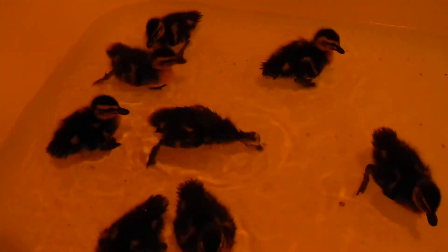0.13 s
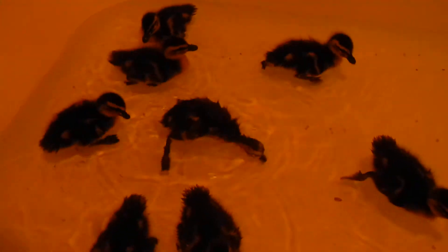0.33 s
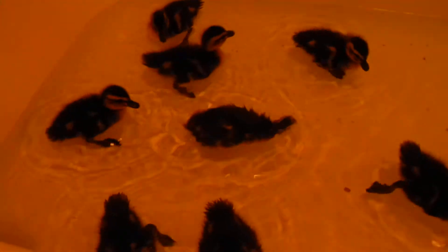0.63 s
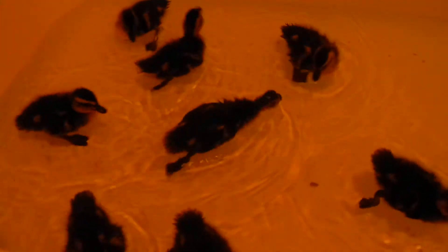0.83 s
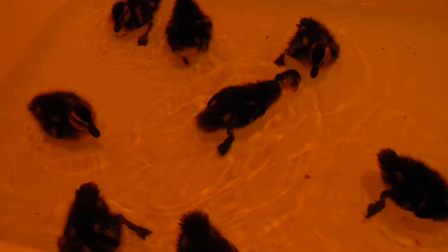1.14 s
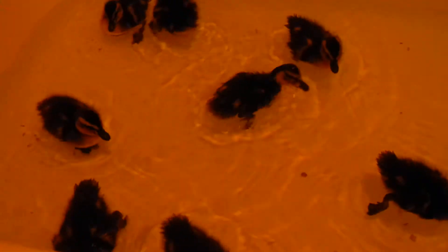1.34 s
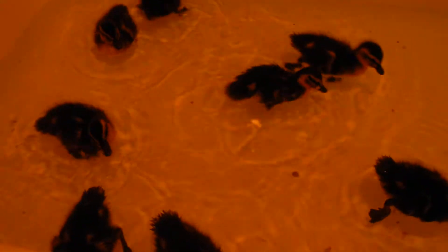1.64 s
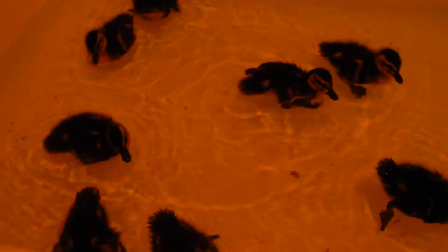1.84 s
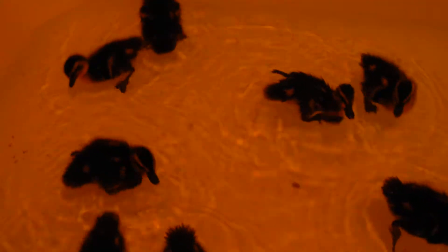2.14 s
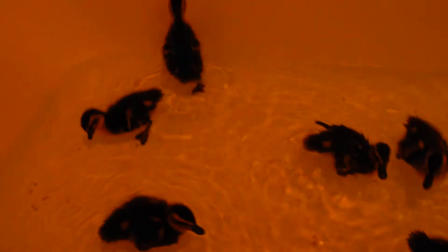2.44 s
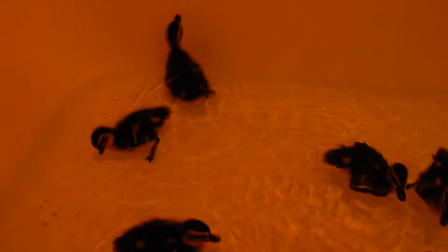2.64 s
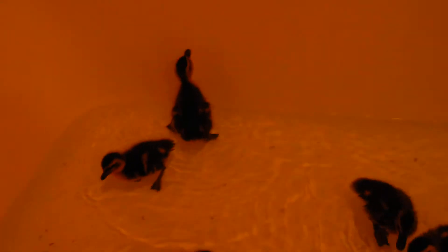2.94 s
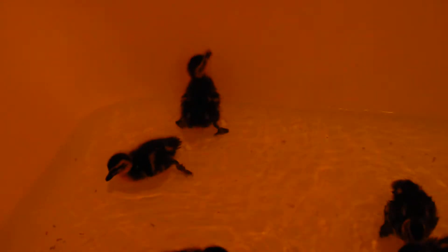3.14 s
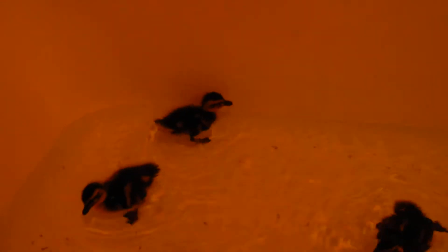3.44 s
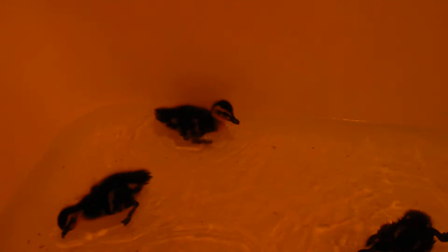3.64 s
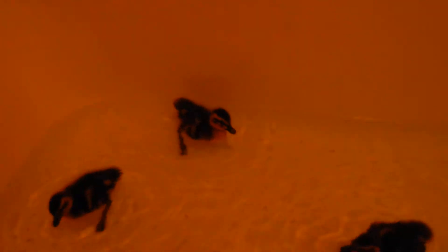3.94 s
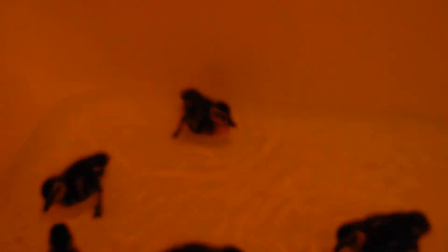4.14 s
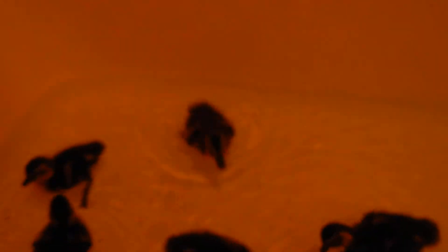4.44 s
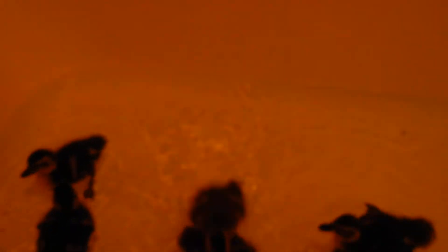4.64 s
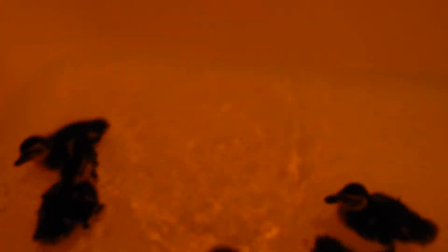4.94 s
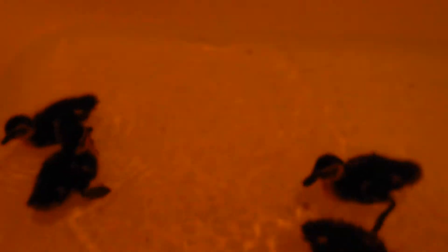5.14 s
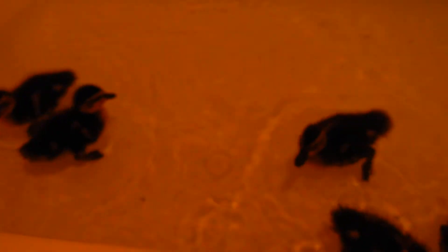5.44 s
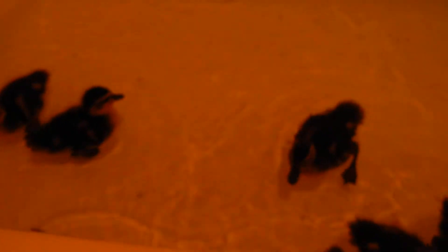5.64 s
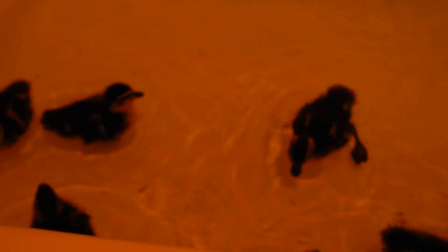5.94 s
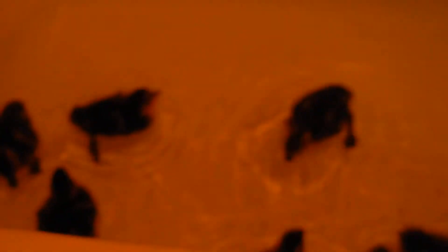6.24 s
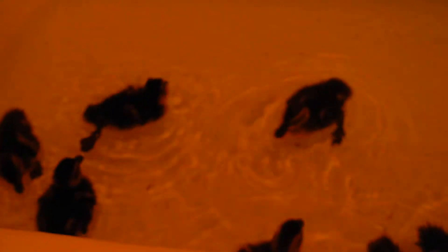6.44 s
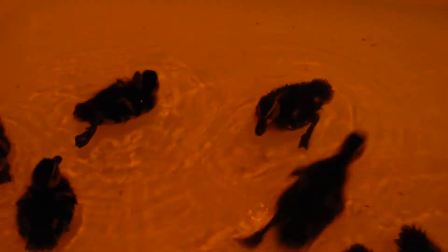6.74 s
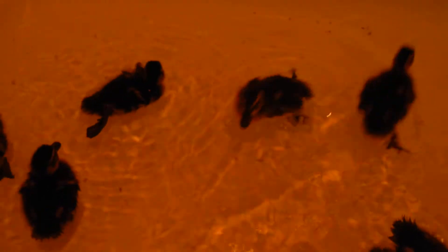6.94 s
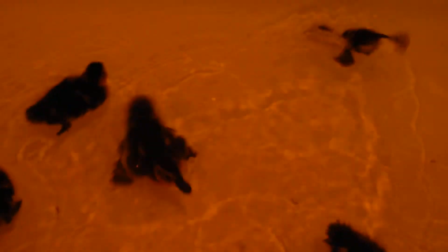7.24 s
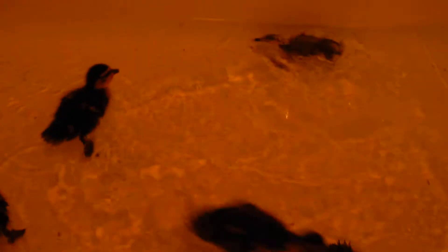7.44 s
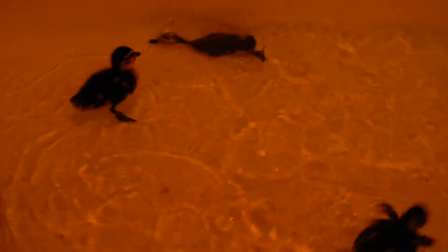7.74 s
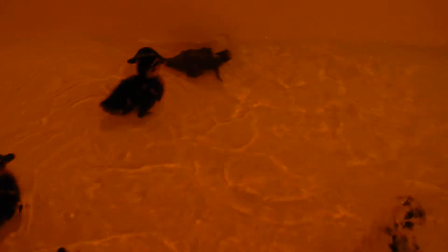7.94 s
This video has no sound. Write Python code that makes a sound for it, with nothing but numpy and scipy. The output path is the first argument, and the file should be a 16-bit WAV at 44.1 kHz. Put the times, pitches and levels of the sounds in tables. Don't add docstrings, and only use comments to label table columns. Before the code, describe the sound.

A close, slightly hissy camera microphone in a small tiled bathroom hears a low ceiling fan hum and gentle lapping. Little feet and bills make scattered plips, crackling sprays and dull tub thumps, with two tiny peeps early and three midway. The lens motor whirrs briefly. After a calm stretch the splashing thickens, ending in two bursts of frantic, foamy paddling full of bright bubble plinks.

```python
import sys
import numpy as np
from scipy import signal
from scipy.fft import rfft, irfft, next_fast_len
from scipy.io import wavfile
from scipy.ndimage import uniform_filter1d, map_coordinates

SR = 44100
rng = np.random.default_rng(int(sys.argv[2]) if len(sys.argv) > 2 else 0)


def transcribe(u):
    v = np.clip(np.atleast_2d(u).T, -1, 1)
    q = np.round(v * 32767).astype(np.int16)
    wavfile.write(sys.argv[1], SR, q)


def how_loud(loudness_db):
    steps = np.asarray(loudness_db, float) / 20
    return 10 ** steps


N = 357210

# (time [s], level [dB])
CAMERA_GAIN = [(0.0, -54), (1.46, -54), (1.96, -52.5), (2.66, -55.5), (3.45, -51.5), (4.04, -53),
               (4.29, -56.5), (4.535, -55), (4.59, -59), (4.65, -54.5), (5.46, -52), (6.09, -52.5),
               (6.25, -50), (6.56, -53), (7.24, -49), (7.56, -50.5), (7.92, -46.5), (8.1, -43)]


def unit(x):
    return x / np.sqrt(np.mean(x ** 2) + 1e-20)


def along(points, hz):
    f, v = np.transpose(points)
    return np.interp(np.log(hz + 1), np.log(f + 1), v)


def curve(rows):
    s, values = np.transpose(rows)
    return np.interp(np.arange(N) / SR, s, values)


def wobble(rate):
    knots = rng.standard_normal(int(N * 40 / SR) + 4)
    return map_coordinates(knots, [np.arange(N) * min(rate, 40) / SR])


def filtered(x, response):
    m = next_fast_len(x.shape[-1] + 8192)
    spectrum = rfft(x, m) * response(np.fft.rfftfreq(m, 1 / SR))
    return irfft(spectrum, m)[..., :x.shape[-1]]


def band(hz, width):
    return lambda f: 1j * f * width / (hz * hz - f * f + 1j * f * width)


def add(track, s, sound):
    part = track[..., round(s * SR):][..., :sound.shape[-1]]
    part += sound[..., :part.shape[-1]]


def lumpy(length, hold, spread_db):
    levels_db = spread_db * rng.standard_normal(length // hold + 1)
    return how_loud(levels_db.repeat(hold)[:length])


def rush(spectrum, patchy_db, alike=None):
    # (frequency [Hz], likeness [0 to 1])
    usual_likeness = [(60, 0.39), (180, 0.66), (550, 0.32), (1650, 0.36), (4970, 0.06), (15000, 0.044)]
    likeness = alike or usual_likeness
    z = signal.stft(rng.standard_normal((2, N)), nperseg=512)[2]
    patches = uniform_filter1d(rng.standard_normal(z.shape[1:]), size=6, axis=0)
    patches = uniform_filter1d(patches, size=10, axis=1)
    pair = signal.istft(z * how_loud(patchy_db * unit(patches)), nperseg=512)[1][:, :N]

    def shape(hz):
        turn = np.arccos(np.clip(along(likeness, hz), -1, 1)) / 2
        return how_loud(along(spectrum, hz)) * [np.cos(turn), np.sin(turn)]

    mid, side = filtered(pair, shape)
    return unit(np.array([mid + side, mid - side]))


def bubble(hz, t60, t, rise=0.0067, attack=0.00041):
    phase = 2 * np.pi * hz * (t + rise * t * t / (2 * t60))
    return np.sin(phase) * how_loud(-60 * t / t60) * (1 - np.exp(-t / attack))


def camera():
    # (frequency [Hz], level [dB])
    hiss_colour = [(2060, 6.5), (3500, -3), (4740, -7), (8830, -7.5), (15800, -8.5)]
    # (frequency [Hz], level [dB])
    whirr_colour = [(1500, -30), (2600, -6), (3850, 0), (4700, -8), (6600, -6), (11000, -17), (13800, -10),
                    (15800, -22)]
    # (time [s], level [dB])
    motor_level = [(3.82, -53.5), (3.86, -45), (4.1, -49), (4.49, -52), (4.51, -112), (6.05, -93),
                   (6.1, -46.5), (6.4, -49.5), (6.7, -52.5), (6.8, -101)]
    hiss = how_loud(curve(CAMERA_GAIN) + 2.5) * rush(hiss_colour, 0.78)
    whirr = how_loud(curve(motor_level)) * rush(whirr_colour, 2.7)
    return hiss + whirr


def room_tone():
    # (frequency [Hz], level [dB])
    mains = [(120, 0), (240, -13)]
    # (frequency [Hz], level [dB per Hz])
    drone_colour = [(12, -54), (20, -34), (86, -4), (102, -0.5), (118, 0), (136, -3), (150, -30),
                    (200, -57), (330, -120)]
    # (frequency [Hz], level [dB])
    rumble_colour = [(82, -4), (140, -7), (182, -10), (237, -7.5), (291, -14), (520, -16.5), (680, -54),
                     (1140, -120)]
    # (frequency [Hz], level [dB])
    lapping_colour = [(240, -18), (400, 11), (561, 2), (856, -11), (1760, -16), (2620, 5.5), (5000, -41),
                      (11000, -120)]
    t = np.arange(N) / SR
    gain_db = curve(CAMERA_GAIN)
    gain_db = gain_db - gain_db.mean()
    hum_db = -46.5 + 0.51 * gain_db
    lapping_db = -57 + 1.1 * gain_db
    lines = np.zeros(N)
    for hz, db in mains:
        lines += how_loud(db + 1.5 * wobble(12)) * np.sin(2 * np.pi * hz * t + .6 * wobble(8))
    drone = rush(drone_colour, 0.48, alike=[(30, 0.35), (100, 0.69)])
    hum = how_loud(hum_db + [[.7], [-.7]]) * (how_loud(2.0) * lines + how_loud(-2.5) * drone)
    rumble = how_loud(-54) * rush(rumble_colour, 2.7)
    lapping = how_loud(lapping_db + 0.3 * wobble(9.0)) * rush(lapping_colour, 4.2)
    return hum + rumble + lapping


def tiles(x):
    # (frequency [Hz], time to fall 60 dB [s])
    echo_t60 = [(150, 0.52), (800, 0.22), (3000, 0.26), (10000, 0.29)]
    # (frequency [Hz], side level [dB])
    echo_width = [(200, -13.5), (2500, -15.5), (5000, -6), (15000, 0.5)]
    out, step = np.zeros((2, N)), int(.3 * SR)
    for start in range(0, N, step):
        hz, t, z = signal.stft(rng.standard_normal((2, SR // 3)), SR, nperseg=256)
        z = z * how_loud(-60 * t / along(echo_t60, hz)[:, None])
        z[1] *= how_loud(along(echo_width, hz))[:, None]
        mid, side = signal.istft(z, SR, nperseg=256)[1]
        tail = np.array([mid + side, mid - side]) / np.linalg.norm(mid)
        add(out, start / SR + .004, signal.fftconvolve(x[None, start:start + step], tail, axes=1))
    return out


def peeps():
    # (time [s], length [s], top pitch [Hz], last pitch [Hz], level [dB])
    calls = [
        (0.031, 0.042, 4040, 2730, -48.5),
        (0.651, 0.051, 3880, 2750, -45.5),
        (4.554, 0.042, 3240, 1920, -41.5),
        (5.021, .064, 3490, 1920, -45),
        (5.201, 0.053, 3776, 2055, -40),
    ]
    crest, rise, roundness = .43, .62, 2.2
    out = np.zeros(N)
    for s, length, top_hz, end_hz, db in calls:
        u = np.linspace(0, 1, int(length * SR))
        before = rise * np.abs(1 - u / crest) ** roundness
        after = np.abs((u - crest) / (1 - crest)) ** roundness
        drop = np.where(u < crest, before, after)
        phase = 2 * np.pi * np.cumsum(top_hz - (top_hz - end_hz) * drop) / SR
        whistle = np.sin(phase) + 0.065 * np.sin(2 * phase)
        breath = np.abs(np.sin(np.pi * u)) ** 0.25
        add(out, s, how_loud(db + 1) * breath * whistle)
    return out


def knocks():
    # (time [s], peak level [dB], tilt [dB per octave], gulp pitch [Hz])
    feet = [(1.185, -27.5, 1.5, 445), (1.364, -32.5, -2, 533), (1.649, -32, 0, 407), (1.673, -25, -6, 302),
            (1.815, -32, -3, 410), (2.522, -19, -5.5, 280), (3.1, -30, -5, 404), (3.118, -30, -8.5, 408),
            (5.152, -13, 0.5, 450), (5.829, -22.5, -9.5, 133), (6.187, -20.5, -2.5, 422),
            (6.448, -28, -3.5, 425), (6.963, -25, 1, 532), (7.721, -24.5, -5.5, 463)]
    # (frequency [Hz], width [Hz], level [dB])
    tub_modes = [(104.4, 14, 1), (210, 62, -8.5), (280, 19, -2.5), (394, 54, -2), (450, 45, -0.5),
                 (623, 53, -7), (763, 68, -6.5), (956, 56, -7.5), (1220, 96, -11.5), (1800, 370, -21.5)]
    out, t = np.zeros(N), np.arange(SR // 3) / SR
    t60 = 0.11
    for s, db, tilt_db, gulp_hz in feet:
        sizes_db = rng.normal(0, 1.5, len(tub_modes))

        def wall(f):
            total = 0
            for k, (hz, width, level) in enumerate(tub_modes):
                octaves = np.clip(np.log2(hz / 350), -1.7, 1.5)
                total = total + (-1) ** k * how_loud(level + sizes_db[k] + tilt_db * octaves) * band(hz, width)(f)
            return total

        push = rng.standard_normal(len(t)) * how_loud(-60 * t / t60) * (1 - np.exp(-t / 0.0083))
        ring = filtered(push, wall)
        gulp = bubble(gulp_hz, 0.74 * t60, t, attack=0.0014)
        add(out, s, how_loud(db) * (ring / np.abs(ring).max() + 0.84 * gulp))
    return out


def droplets():
    out, t = np.zeros((2, N)), np.arange(SR // 60) / SR
    for when, pitch, size, side in rng.random((260, 4)):
        hz = 2200 * 2 ** (2.4 * pitch)
        pan = np.array([[side], [1 - side]]) ** .4
        level = how_loud(-52 - 3 * np.log(size + 0.034))
        add(out, when * N / SR, level * pan * bubble(hz, 40 / hz, t))
    return out


def sprays():
    # (time [s], peak level [dB], centre pitch [Hz], time to fall 60 dB [s])
    bursts = [(0.555, -21, 7900, 0.018), (1.621, -32, 10300, 0.22), (1.661, -26.5, 7300, .084),
              (1.9133, -31, 7100, .05), (1.997, -27, 5700, 0.082), (2.0592, -30.5, 10000, 0.21),
              (2.141, -21, 8500, 0.15), (2.371, -25.5, 5200, 0.087), (2.4572, -28.5, 6440, 0.097),
              (3.122, -26.5, 8900, 0.098), (3.194, -28, 5940, .053), (3.553, -24.5, 7060, 0.1),
              (3.6154, -17, 10100, 0.066), (3.7495, -34, 10500, 0.049), (5.3634, -22.5, 10800, 0.058),
              (5.4935, -32, 7500, 0.036), (5.778, -29, 7000, 0.079), (6.0582, -26, 6400, 0.2),
              (6.09, -15, 6700, 0.11), (6.127, -21.5, 12600, .064), (6.227, -22.5, 6400, 0.045),
              (6.3362, -25, 7860, 0.088), (7.175, -20, 9400, 0.018), (7.2943, -27, 11100, .071),
              (7.3173, -28, 10100, .1), (7.3966, -47, 6990, .079), (7.5118, -21.5, 9550, 0.16),
              (7.6496, -17, 5640, 0.17), (7.7547, -26, 6400, 0.086), (7.936, -23, 5400, 0.37),
              (1.425, -45, 6000, 0.047), (1.811, -38, 4600, .05), (1.875, -36, 6160, .04),
              (2.664, -36, 14500, .05), (2.738, -35, 5410, .05), (2.783, -35, 10100, .05),
              (3.057, -39, 8700, .05), (3.25, -34, 4930, .05), (3.437, -44, 6030, 0.047),
              (3.498, -38, 7190, .05), (3.599, -30, 9990, .05), (3.82, -28, 5460, .05),
              (4.529, -34, 6660, 0.047), (4.637, -37, 9000, 0.087), (4.697, -37, 7000, .05),
              (4.822, -34, 5000, .05), (5.154, -32, 8500, .06), (5.372, -23, 14500, .1),
              (7.165, -32, 9120, .06), (7.844, -26, 5170, 0.088)]
    out, t = np.zeros((2, N)), np.arange(SR // 5) / SR
    swell = (t / .009) ** 2 / (1 + (t / .009) ** 2)
    tick_shape = 1.6 * np.exp(-np.abs(t - .0105) / .0004) + .4 * np.exp(-np.abs(t - .0115) / .004)
    for s, db, hz, t60 in bursts:
        pan_db = 2.5 - 2 * rng.standard_normal()
        drops = rng.standard_normal((2, len(t))) * lumpy(len(t), 40, 3.5)
        drops = drops + 0.28 * drops[::-1]
        fizz = unit(filtered(drops, lambda f: band(hz, 0.35 * hz)(f) ** 2))
        fizz = fizz * swell * how_loud(-60 * t / max(t60, .005))
        ticks = unit(filtered(drops, band(hz, 7000))) * tick_shape
        crispness = 1.68 / (1 + (t60 / 0.099) ** 2)
        level = how_loud(db - 15 + np.array([[pan_db / 2], [-pan_db / 2]]))
        add(out, s - .0093, level * (fizz + crispness * ticks))
    return out


def churn():
    # (time [s], level [dB], bubble pitch [Hz])
    dashes = [
        [(1.31, -37, 1690), (1.39, -44.5, 1880), (1.5, -56, 1210)],
        [(4.55, -67, 2700), (4.566, -51.5, 2600), (4.8, -49, 1490)],
        [(6.02, -78, 2080), (6.224, -37, 606), (6.33, -60, 910)],
        [(6.68, -56, 1080), (6.762, -30.5, 2100), (6.792, -32.5, 1570), (7.152, -39, 1310), (7.29, -65, 1800)],
        [(7.29, -38, 2100), (7.454, -27.5, 760), (7.756, -31, 1900), (7.9, -44, 634), (7.978, -24, 1870),
         (8.1, -28.5, 730)],
    ]
    # (frequency [Hz], level [dB])
    foam_colour = [(200, 2), (400, -10.5), (735, 7.5), (900, -4), (2160, 4.5), (4260, -18), (9830, -9),
                   (16000, -17)]
    foam = rush(foam_colour, 5, alike=[(300, .97), (3000, .95), (5000, .5), (15000, .3)])
    out, t, now = np.zeros((2, N)), np.arange(SR // 18) / SR, np.arange(N) / SR
    for rows in dashes:
        s, level_db, centre_hz = np.transpose(rows)
        length = s[-1] - s[0]
        cloud = np.zeros(N)
        for u, pitch, size, life in rng.random((int(550 * length), 4)):
            when = s[0] + u * length
            hz = np.interp(when, s, centre_hz) * 2 ** (2.2 * (pitch - .5))
            hz = np.clip(hz, 350, 3600)
            level = how_loud(-5 * np.log(size + 0.013))
            add(cloud, when, level * bubble(hz, (4 + 12 * life) / hz, t, rise=0.057))
        cloud /= np.sqrt(np.abs(uniform_filter1d(cloud ** 2, size=5000)) + 0.18)
        froth = filtered(foam, lambda f: 0.31 + band(np.mean(centre_hz), 2500)(f))
        froth = how_loud(-7 + 3.6 * wobble(38)) * froth
        inside = np.interp(now, [s[0], s[0] + .02, s[-1], s[-1] + .02], [0, 1, 1, 0])
        out += inside * how_loud(np.interp(now, s, level_db)) * (how_loud(-6.0) * cloud + froth)
    return out


def plinks():
    # (time [s], peak level [dB], bubble pitch [Hz], time to fall 60 dB [s])
    foot_bubbles = [(.558, -41, 686, 0.11), (3.606, -33, 444, 0.093), (3.614, -30, 2940, 0.03),
                    (3.822, -27.5, 730, 0.02), (3.845, -38, 390, 0.056), (4.527, -32, 740, 0.018),
                    (4.611, -36, 1834, 0.15), (4.71, -33, 2465, 0.04), (4.765, -35.5, 1205, 0.048),
                    (4.843, -31.5, 880, 0.068), (5.156, -7.5, 826, 0.009), (5.772, -31, 3530, 0.0073),
                    (6.278, -24.5, 2150, 0.016), (6.455, -35, 685, 0.022), (6.817, -4.5, 1320, 0.0089),
                    (6.895, -17, 1875, 0.029), (6.949, -21, 2010, 0.02), (7.004, -9, 1360, 0.013),
                    (7.177, -20, 744, 0.021), (7.176, -20, 1970, 0.01), (7.301, -20.5, 1850, 0.022),
                    (7.312, -22, 3500, 0.0064), (7.317, 2.5, 2230, 0.0076), (7.429, -14, 544, 0.063),
                    (7.479, -28, 2587, 0.071), (7.511, -9.5, 2540, 0.012), (7.699, -10.5, 2090, 0.018),
                    (7.7, -20, 1256, 0.046), (7.758, -25, 2290, 0.028), (7.964, -18, 1810, 0.034),
                    (1.196, -25, 597, 0.028), (4.517, -40, 2250, .03), (4.66, -36, 3400, .02),
                    (4.657, -34, 2200, 0.027), (4.762, -44, 2730, .03), (4.785, -40, 1150, .03),
                    (4.834, -21.5, 2180, .03), (6.772, -28.5, 900, 0.039), (6.836, -32, 3050, 0.045),
                    (6.832, -22.5, 776, 0.05), (6.926, -31, 1250, 0.084), (7.054, -24, 1270, 0.033),
                    (7.068, -29, 754, .04), (7.076, -26, 2060, 0.023), (7.238, -36, 1900, .03),
                    (7.397, -17.5, 725, 0.03), (7.607, -19.5, 710, 0.042), (7.632, -23.5, 747, 0.13),
                    (7.715, -18, 2080, 0.019), (7.755, -30, 4000, .02)]
    bill_dabs = [(1.81, -29, 2270, 0.019), (1.817, -12, 825, 0.0059), (1.734, -34.5, 2750, 0.024),
                 (2.127, -29, 2570, 0.011), (2.143, -24.5, 2470, 0.0085), (2.393, -27, 1806, 0.033),
                 (2.617, -30, 2570, 0.013), (3.201, -34, 770, 0.024), (3.251, -19.5, 1886, 0.021),
                 (3.612, -17, 2060, 0.0082), (4.693, -31.5, 1387, 0.037), (4.728, -37, 2670, 0.029),
                 (4.824, -19.5, 2127, 0.045), (5.16, -20.5, 1440, 0.015), (6.08, -26, 1700, 0.014),
                 (6.119, -27, 3280, .022), (6.188, -24, 970, 0.028), (6.195, -22.5, 762, 0.061),
                 (6.738, -35, 2450, 0.029), (6.763, -17.5, 2035, 0.03), (7.184, -29, 2950, 0.028),
                 (7.4, -21.5, 1175, 0.09), (7.606, -6.5, 1180, 0.012), (7.648, -15, 1740, 0.03),
                 (7.88, -26.5, 760, 0.21), (8.004, -17, 1880, 0.027), (8.008, -22, 600, 0.04)]
    flat_slaps = [(.554, -21, 1800, 0.0081), (1.361, -62, 534, 0.021), (1.8165, -25, 2930, 0.0089),
                  (1.185, -29.5, 1700, 0.012), (1.317, -32, 980, 0.028), (2.523, -26, 750, 0.0052),
                  (3.552, -32, 1870, 0.0051), (3.601, -24.5, 780, 0.013), (3.82, -26.5, 1860, 0.017),
                  (4.052, -35, 2400, 0.033), (4.525, -33, 2360, 0.05), (5.131, -32, 1060, 0.016),
                  (7.294, -28, 1780, .02), (1.363, -34, 2190, 0.015), (6.963, -30.5, 1900, 0.08),
                  (5.367, -20, 3240, 0.017), (6.056, -28.5, 1790, 0.0099), (6.078, -19, 3800, .016),
                  (6.172, -29.5, 3200, 0.0056), (7.396, -23, 1538, 0.095), (7.511, -22.5, 641, 0.17),
                  (7.816, -27.5, 810, 0.043)]
    out, t = np.zeros(N), np.arange(SR // 6) / SR
    for rows, wash_db in [(foot_bubbles, -33.5), (bill_dabs, -13), (flat_slaps, -1)]:
        wash_shape = how_loud(wash_db - 60 * t / 0.058) * (1 - np.exp(-t / 0.0038))
        for s, db, hz, t60 in rows:
            life = max(t60, .004)
            ring = bubble(hz, life, t)
            for pitch, late in rng.random((3, 2)):
                stray = bubble(hz * 2 ** (.5 * (pitch - .5)), 0.57 * life, t)
                add(ring, .012 * late, 0.36 * stray)
            splash = lumpy(len(t), 100, 5.3) * rng.standard_normal(len(t))
            wash = unit(filtered(splash, band(np.sqrt(hz * 1700), 2800)))
            add(out, s, how_loud(db) * (ring + wash * wash_shape))
    return out


def scene():
    # (frequency [Hz], level [dB])
    water_shade = [(100, -4), (2600, 0), (3600, -1), (4500, -9), (7000, -11.5), (16000, -23.5)]
    water = filtered(plinks() + knocks(), lambda f: how_loud(along(water_shade, f)))
    birds = peeps()
    drops = sprays() + droplets()
    foam = churn()
    to_walls = how_loud(-3.0) * water + how_loud(1) * birds + how_loud(-4.0) * (drops + foam).mean(axis=0)
    echoes = tiles(to_walls)
    add(echoes, .012, how_loud(-13) * (water + 2 * birds))
    add(echoes, .0235, how_loud(-19.5) * (water + 2 * birds))
    return water + birds + drops + foam + echoes + room_tone() + camera()


def low_pass(x):
    return signal.sosfilt(signal.butter(12, 15750, fs=SR, output="sos"), x)


def record(dry):
    # (time [s], half length [s], depth [dB])
    dimmed_high = [(4.40, .09, 60), (4.3, .2, 14), (4.62, .06, 32), (4.75, .05, 60), (4.95, .15, 9),
                   (6.62, .1, 40), (6.5, .3, 12), (7.77, .06, 35)]
    # (time [s], half length [s], depth [dB])
    dimmed_low = [(4.59, .7, 8), (6.445, .2, 14), (7.97, .16, 14)]
    hz, t, z = signal.stft(dry, SR, nperseg=1024)

    def holes(rows, centre_hz, width_hz):
        across = np.exp(-((hz[:, None] - centre_hz) / width_hz) ** 2)
        return across * sum(db * np.exp(-((t - s) / half) ** 2) for s, half, db in rows)

    depth_db = holes(dimmed_high, 12400, 960) + holes(dimmed_low, 293, 143)
    cleaned = signal.istft(z * how_loud(-depth_db), SR, nperseg=1024)[1][:, :N]
    mix = filtered(cleaned, lambda f: (f < 15900) * f ** 2 / (f ** 2 + 45 ** 2))
    return low_pass(mix)


dry = scene()
out = record(dry)
transcribe(out)
```